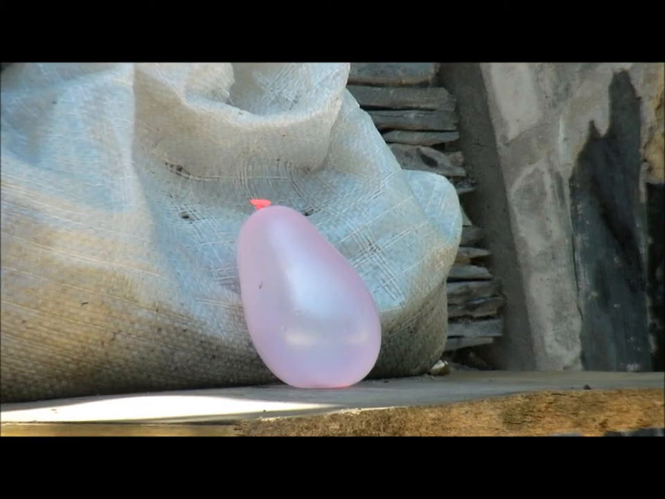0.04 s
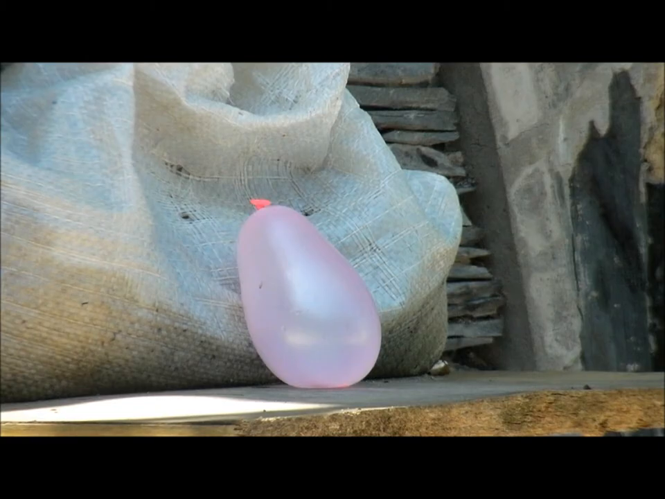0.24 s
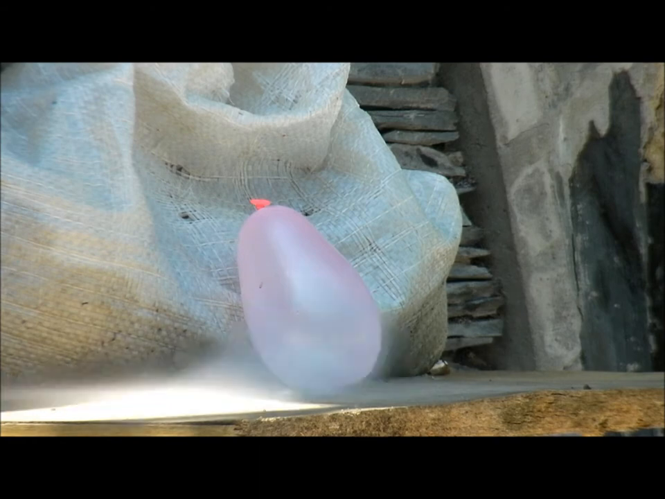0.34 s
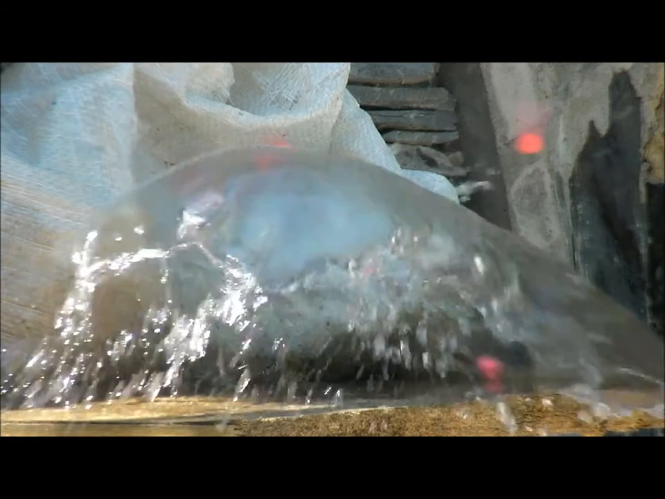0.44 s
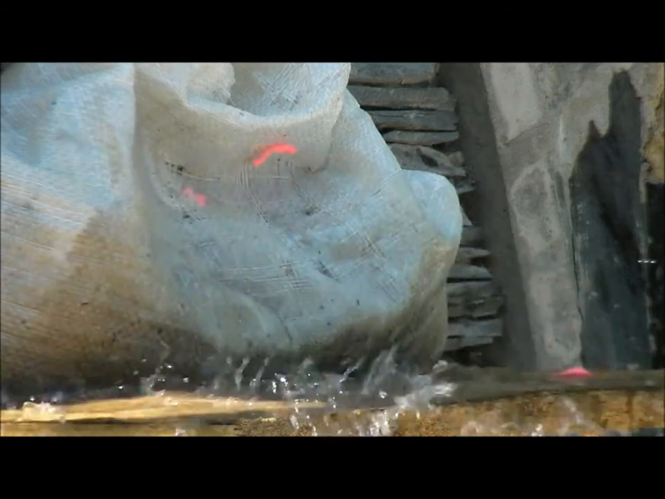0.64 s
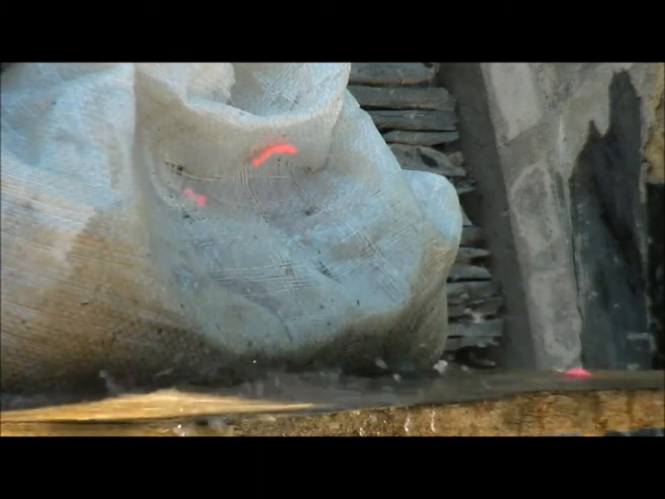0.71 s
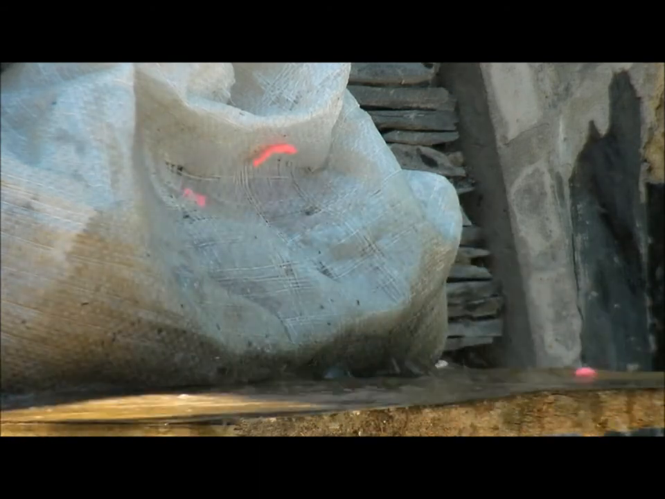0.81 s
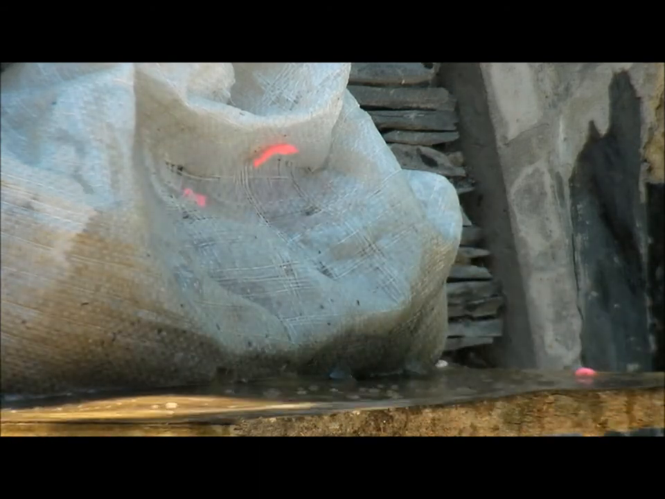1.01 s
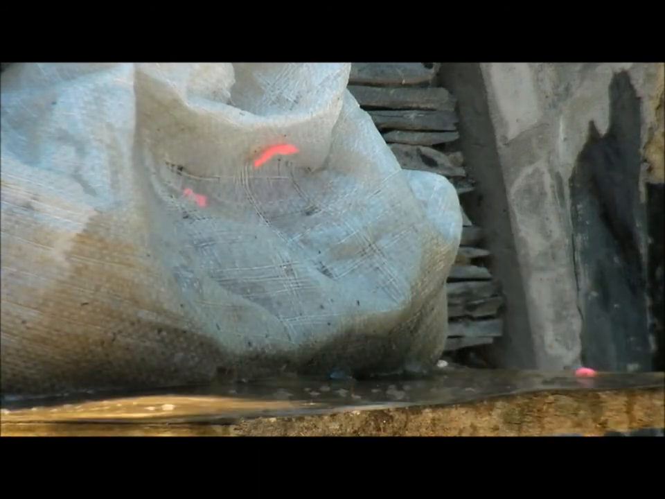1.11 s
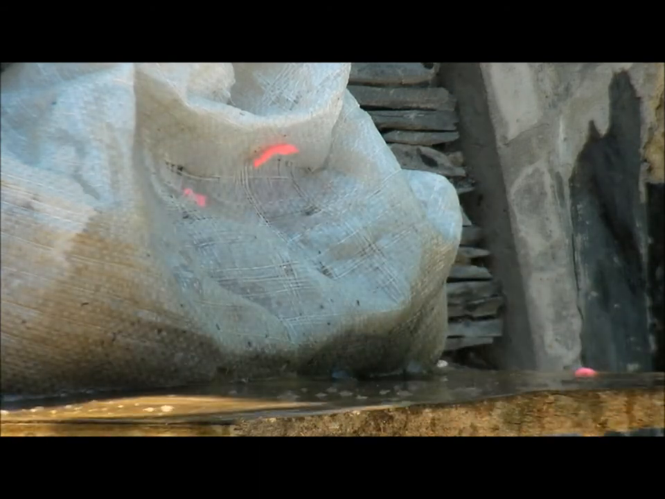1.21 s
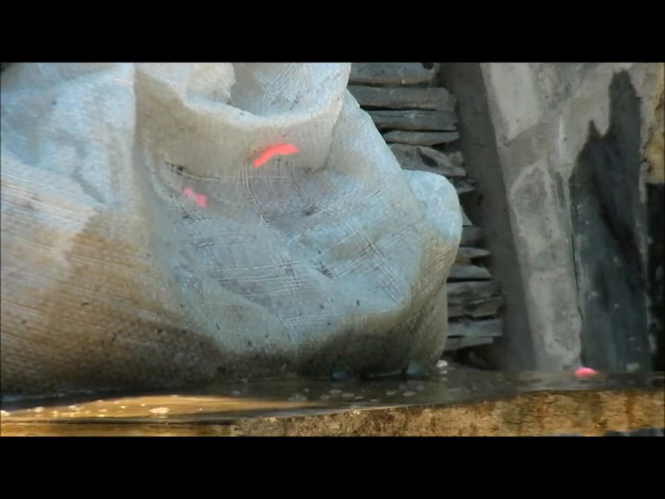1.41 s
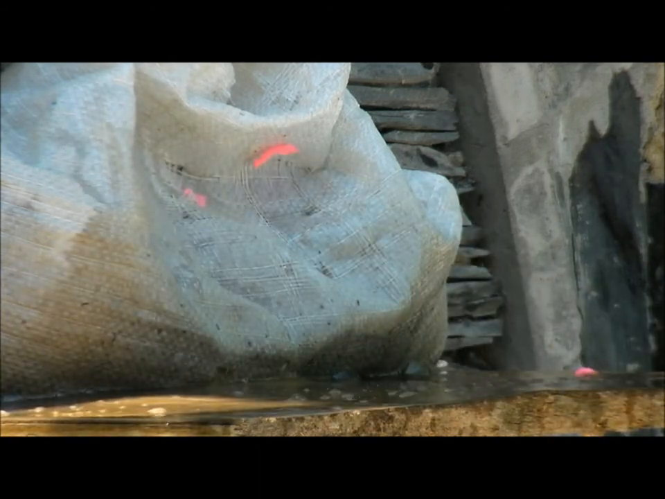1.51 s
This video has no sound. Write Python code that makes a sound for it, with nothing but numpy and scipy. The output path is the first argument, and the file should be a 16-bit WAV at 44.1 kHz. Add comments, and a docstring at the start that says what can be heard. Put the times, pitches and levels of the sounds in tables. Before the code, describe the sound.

A water balloon bursts on a stone ledge after a quick air gun snap; spray tears and water slaps down, then drops patter out over faint hiss and low rumble, recorded close with clipping stereo microphones.

```python
"""Faint air hiss and a low wavering rumble fade up first, then an air gun snaps and pops.
Its pellet bursts a water balloon on a stone ledge close to a camera, whose two microphones overload.
The water tears into spray (fine noise grains) and slaps down (coarse grains, bubbles, dying tones and thumps).
The walls ring on, and late drops patter on the stone as short noisy rings with bright ticks."""
import sys
import numpy as np
from scipy import signal
from scipy.fft import rfft, irfft
from scipy.io import wavfile
from scipy.ndimage import uniform_filter1d

SR = 44100
rng = np.random.default_rng(int(sys.argv[2]) if len(sys.argv) > 2 else 0)


def level_to_linear(level):
    """Convert decibel levels to linear amplitude factors, elementwise."""
    exponent = np.asarray(level, float) / 20
    return 10 ** exponent


def dump(signal):
    """Clip the signal to [-1, 1] and save it as 16-bit WAV at the path in sys.argv[1]."""
    limited = np.clip(np.atleast_2d(signal).T, -1, 1)
    pcm = np.round(limited * 32767).astype(np.int16)
    wavfile.write(sys.argv[1], SR, pcm)


N = 68355  # length [samples]


def evened(x):
    """Scales to rms 1."""
    return x / np.sqrt(np.mean(x ** 2) + 1e-20)


def read(points, hz):
    """Reads a table on a log-frequency axis."""
    f, value = np.transpose(points)
    return np.interp(np.log(hz + 1), np.log(f + 1), value)


def level(curve):
    """Gain over time from a dB curve, all but silent before its first point."""
    s, db = np.transpose(curve)
    return level_to_linear(np.interp(np.arange(N) / SR, s, db, left=-120))


def add(mix, s, sound):
    """Adds a sound at time s, cut off at the end of the mix."""
    part = mix[:, round(s * SR):][:, :sound.shape[1]]
    part += sound[:, :part.shape[1]]


def colour(x, tone):
    """Filters noise by a spectrum table, then scales to rms 1."""
    gain = level_to_linear(read(tone, np.fft.rfftfreq(N, 1 / SR)))
    return evened(irfft(rfft(x) * gain, N))


def band(x, hz, width_hz):
    """One resonance applied twice, rms 1."""
    b, a = signal.iirpeak(min(hz, 0.45 * SR), hz / width_hz, SR)
    return evened(signal.lfilter(b, a, signal.lfilter(b, a, x)))


def sine(hz, t):
    """A steady pure tone."""
    return np.sin(2 * np.pi * hz * t)


def dying(t, db, t60, rise_s):
    """A quick rise times a decay that starts at db and falls 60 dB in t60 seconds."""
    return level_to_linear(db - 60 * t / t60) * (1 - np.exp(-t / rise_s))


def grains(per_s, spread_db, grain_s, bed):
    """Two draws of noise swelling in short puffs of random size, over a steady bed."""
    size = level_to_linear(spread_db * np.minimum(rng.exponential(1, N), 4))
    size *= rng.random(N) < per_s / SR
    power = signal.lfilter([1], [1, -np.exp(-1 / (grain_s * SR))], size ** 2)
    return (bed + evened(np.sqrt(power))) * rng.standard_normal((2, N))


def slow_drift():
    """A slow random wander of rms 1."""
    noise = rng.standard_normal(N)
    return evened(uniform_filter1d(uniform_filter1d(noise, 1800), 1800))


# Spectrum of the air hiss: (frequency [Hz], level [dB per Hz])
AIR_TONE = [(76, -33.5), (130, -8), (180, -11), (330, -9.5), (450, -8), (700, -12), (1600, -14),
            (2400, -20), (3300, -20), (4300, -16.5), (5200, -24.5), (7900, -31), (12000, -30.5),
            (12800, -25), (13600, -29.5), (15400, -29.5)]
# Swell of the dull part of the hiss: (time [s], level [dB])
AIR_DULL_SWELL = [(0, -0.5), (.6, 0.5), (1.05, -3), (1.2, 1), (1.4, -1.5), (1.55, 1)]


def air_hiss():
    """Air noise whose strength drifts in patches of time and pitch, while its dull part swells."""
    hz, t, z = signal.stft(rng.standard_normal((2, N)), SR, nperseg=2048)
    swell_db = np.interp(t, *np.transpose(AIR_DULL_SWELL))
    z *= level_to_linear(swell_db / (1 + (hz[:, None] / 800) ** 2))  # the swell fades out above 800 Hz
    patches = uniform_filter1d(rng.standard_normal(z.shape[1:]), size=2, axis=0)
    patches = evened(uniform_filter1d(patches, size=3, axis=1))
    patchy = signal.istft(z * level_to_linear(3.3 * patches), SR, nperseg=2048)[1][:, :N]
    return level_to_linear(-48.5) * colour(patchy, AIR_TONE)


# Spectrum of the low noise bed: (frequency [Hz], level [dB per Hz])
LOW_BED_TONE = [(10, -77), (25, -45), (45, -27.5), (68, 1.5), (82, -11), (145, -10), (170, -25.5),
                (260, -54), (440, -120)]


def low_bed():
    """Steady noise, strongest in the deep bass, under the rumble."""
    return level_to_linear(-53.5) * colour(rng.standard_normal((2, N)), LOW_BED_TONE)


# Strength of the rumble, one list before and one after the burst: (time [s], level [dB])
RUMBLE_LEVEL = [
    [(0.0, -67), (0.012, -67), (0.022, -48.5), (0.036, -39), (0.054, -43), (0.076, -52), (0.088, -65),
     (0.102, -50), (0.124, -45), (0.164, -35), (0.225, -43)],
    [(0.33, -49), (0.346, -67), (0.366, -44), (0.386, -37), (0.41, -42), (0.502, -44.5), (0.532, -67),
     (0.56, -47), (0.59, -64), (0.618, -44.5), (0.646, -42), (0.676, -63), (0.692, -47.5), (0.726, -48),
     (0.76, -65), (0.794, -47), (0.818, -50), (0.838, -67), (0.856, -50), (0.882, -45), (0.9, -49),
     (0.914, -66.5), (0.978, -45), (1.1, -39.5), (1.148, -47.5), (1.212, -65), (1.226, -50), (1.44, -50),
     (1.454, -67), (1.55, -57)],
]
# Pitch of the rumble before its waver: (time [s], frequency [Hz])
RUMBLE_PITCH = [(0, 103.9), (.2, 106.7), (.45, 110.9), (.62, 97.86), (1.1, 96.7), (1.44, 93.2),
                (1.55, 82.5)]


def rumble():
    """A low tone blended with noise around its pitch, wavering in strength and pitch."""
    clean, waver, width_hz = 0.72, 0.04, 58  # share of pure tone, rms pitch ratio, noise width
    hz = np.interp(np.arange(N) / SR, *np.transpose(RUMBLE_PITCH)) * (1 + waver * slow_drift())
    tone = np.sqrt(2) * np.sin(2 * np.pi * np.cumsum(hz) / SR)
    noise = band(rng.standard_normal((2, N)), hz.mean(), width_hz)
    return evened(clean * tone + (1 - clean) * noise) * level(RUMBLE_LEVEL[0] + RUMBLE_LEVEL[1])


# Wavering tones in the background: (time [s], length [s], level [dB], frequency [Hz])
FAINT_TONES = [(0.022, 0.077, -53, 1000), (0.098, 0.068, -56, 970), (1.249, 0.064, -57.5, 350),
               (1.26, 0.0533, -57.5, 531), (1.29, 0.058, -60, 1520), (1.339, 0.055, -54, 561),
               (1.428, 0.055, -55, 1590)]


def faint_tones():
    """Short soft tones that swell and fade while their pitch wanders slightly."""
    out, drift = np.zeros((2, N)), slow_drift()
    for s, length, db, hz in FAINT_TONES:
        size = round(length * SR)
        wavering_hz = hz * (1 + 0.014 * drift[-size:])
        tone = np.sin(2 * np.pi * np.cumsum(wavering_hz) / SR)
        add(out, s, level_to_linear(db) * np.sqrt(np.hanning(size)) * tone * np.ones((2, 1)))
    return out


def background():
    """All that sounds around the ledge apart from gun and water."""
    return air_hiss() + low_bed() + rumble() + faint_tones()


# Small drops falling in clumps: (time [s], level [dB])
PATTER_LEVEL = [(.56, -56), (.635, -58), (.642, -45.5), (.66, -48), (.683, -51), (.692, -45.5),
                (.735, -46.5), (.745, -54), (.775, -53), (.785, -48.5), (.81, -48.5), (.835, -53.5),
                (.875, -57), (.89, -55), (.92, -59), (1.0, -65.5), (1.07, -63), (1.15, -71)]
# Spectrum of the small drops: (frequency [Hz], level [dB per Hz])
PATTER_TONE = [(1200, -45), (2200, -19.5), (3000, -3), (4300, -3.5), (6500, -3), (7800, -18.5), (9000, -4),
               (15400, -15)]


def patter():
    """Small drops on stone: sparse, very short grains of widely varied size at random times."""
    fade = np.clip((PATTER_LEVEL[-1][0] - np.arange(N) / SR) / 0.1004, 0, 1)
    fine = grains(per_s=680, spread_db=5.0, grain_s=0.001096, bed=0.53)
    return colour(fine, PATTER_TONE) * level(PATTER_LEVEL) * fade


# Single late drops: (time [s], splat level [dB], splat frequency [Hz], treble tick level [dB])
DROPS = [(0.5244, -27.5, 4560, -56.5), (0.585, -33, 2630, -50), (0.5904, -35, 4500, -52),
         (0.6106, -47.5, 2970, -46), (0.6421, -34, 5900, -44), (0.6439, -32.5, 4080, -41.5),
         (0.6674, -38, 3860, -46.5), (0.6893, -26.5, 4034, -51), (0.696, -29, 4980, -47),
         (0.7004, -35, 3570, -45), (0.7074, -27, 4480, -48.5), (0.7162, -32, 4160, -47),
         (0.7214, -35, 3100, -51.5), (0.7233, -30.5, 4200, -47), (0.732, -37, 4150, -40),
         (0.7387, -46.5, 4700, -29), (0.7612, -36, 3760, -49.5), (0.7814, -29, 5000, -55.5),
         (0.7917, -41, 5640, -49.5), (0.7971, -33.5, 4500, -49.5), (0.8002, -29, 5720, -48.5),
         (0.821, -36, 6900, -50.5), (0.8266, -40, 4200, -51), (0.8404, -45, 3740, -54),
         (0.8614, -45, 3880, -54), (0.8814, -50, 4030, -59), (0.8904, -41, 4240, -55.5),
         (0.9036, -40, 4402, -58), (1.0694, -44.5, 4260, -56.5)]


def drops():
    """Each late drop on the stone is a short, partly noisy ring with a bright tick."""
    clean, width_hz, ring_s, tick_s = 0.4, 2200, 0.02, 0.008  # share of pure tone; times to fall 60 dB
    out, t = np.zeros((2, N)), np.arange(1500) / SR
    for s, db, hz, tick_db in DROPS:
        splat_noise, tick_noise = rng.standard_normal((2, 2, len(t)))
        splat = clean * np.sqrt(2) * sine(hz, t) + (1 - clean) * band(splat_noise, hz, width_hz)
        tick = band(tick_noise, 12000, 9000) * level_to_linear(tick_db - 60 * t / tick_s)
        add(out, s, splat * dying(t, db, ring_s, rise_s=0.00049) + tick)
    return out


# Slosh of the falling water and its ring between the walls: (time [s], level [dB])
SLOSH_LEVEL = [(.238, -52), (.246, -19.5), (.262, -18.5), (.275, -13.5), (.287, -7.5), (.305, -14.5),
               (.325, -24), (.343, -23), (.355, -17.5), (.374, -20), (.385, -16.5), (.42, -20.5),
               (.435, -23), (.45, -21.5), (.469, -27), (.50, -30.5), (.535, -31), (.565, -35), (.6, -39.5),
               (.64, -45), (.75, -54.5), (.95, -79)]
# Spectrum of the slosh: (frequency [Hz], level [dB per Hz])
SLOSH_TONE = [(60, -44.5), (150, -9.5), (300, -22.5), (500, -16.5), (750, -5.5), (1100, -3), (1500, -1.5),
              (2200, -5), (3000, -18), (5000, -24.5), (9000, -61)]


def slosh():
    """Coarser, lower grains of heavy water with bubbles of many sizes in it."""
    bubbles, cycles = np.zeros((2, N)), 14
    for hz in np.geomspace(350, 2200, num=24):
        turns = np.arange(0, cycles, hz / SR)
        swell = np.sin(np.pi * np.sqrt(turns / cycles)) ** 2
        pop = np.sin(2 * np.pi * turns * (1 + 0.003 * turns)) * swell  # pitch creeps up
        starts = (rng.random((2, N)) < 8 / SR) * 1.0  # 8 bubbles per second of each size
        bubbles += signal.oaconvolve(starts, pop[None], axes=1)[:, :N]
    lumps = colour(grains(per_s=300, spread_db=2.0, grain_s=0.002, bed=3.5), SLOSH_TONE)
    return (lumps + level_to_linear(-5) * colour(bubbles, SLOSH_TONE)) * level(SLOSH_LEVEL)


# Tearing spray: (time [s], level [dB])
SPRAY_LEVEL = [(.238, -48.5), (.243, -14.5), (.251, -26.5), (.254, -9), (.260, -17.5), (.266, -2.5),
               (.278, -4), (.292, -2.5), (.30, -8.5), (.327, -11.5), (.345, -17), (.40, -18), (.469, -28),
               (.53, -35.5), (.6, -49), (.68, -48.5), (.8, -85)]
# Spectrum of the spray before it dulls: (frequency [Hz], level [dB per Hz])
SPRAY_TONE = [(880, -45), (1500, -11.5), (1860, -2.5), (2420, -8), (3180, -4.5), (3440, -4.5), (4560, -2.5),
              (6420, -10), (15400, -17)]


def spray():
    """Dense fine grains that grow duller as the sheet of water falls apart."""
    dulls_db, from_s, over_s = 6, 0.285, 0.047  # final loss per octave above 4 kHz; start, time constant
    fine = colour(grains(per_s=1700, spread_db=1.0, grain_s=0.0018, bed=0.69), SPRAY_TONE)
    hz, t, z = signal.stft(fine, SR, nperseg=256)
    octaves = np.maximum(np.log2((hz[:, None] + 1) / 4000), 0)
    loss_db = dulls_db * (1 - np.exp(-np.maximum(t - from_s, 0) / over_s)) * octaves
    return signal.istft(z / level_to_linear(loss_db), SR, nperseg=256)[1][:, :N] * level(SPRAY_LEVEL)


# Air trapped in the water: (time [s], level [dB], frequency [Hz], time to fall 60 dB [s])
GLUGS = [(.258, -9.5, 597.5, 0.091), (.287, -11.5, 785.7, 0.053), (.350, -17, 1117, 0.073),
         (.595, -31, 738, 0.0713), (.352, -16.5, 617, .08), (.36, -25, 298, .08), (.385, -31, 353.8, 0.064),
         (.445, -27, 800, 0.043), (.495, -35.5, 363, 0.14), (.505, -27.5, 727, 0.16)]


def glugs():
    """Trapped air rings in the water as plain dying tones."""
    out, t = np.zeros((2, N)), np.arange(6000) / SR
    for s, db, hz, t60 in GLUGS:
        add(out, s, dying(t, db, t60, rise_s=0.0033) * sine(hz, t) * np.ones((2, 1)))
    return out


# Air push of pop, burst and slap: (time [s], right level [dB], frequency [Hz], time to fall 60 dB [s])
THUMPS = [(.255, -13.5, 110, .05), (0.279, -3, 103.6, 0.055), (.278, -13, 35, .08), (0.353, -23, 150, .1)]


def thumps():
    """Low pushes of air as dying tones, stronger at the right microphone."""
    out, t = np.zeros((2, N)), np.arange(6000) / SR
    sides = level_to_linear(np.array([[-7], [0]]))  # left, right [dB]
    for s, db, hz, t60 in THUMPS:
        add(out, s, dying(t, db, t60, rise_s=0.003) * sine(hz, t) * sides)
    return out


# Gun and water blows: (time [s], level [dB], centre [Hz], width [Hz], time to fall 60 dB [s])
BLOWS = [(.2402, -4.5, 4500, 2500, 0.011), (0.2431, -1.5, 5910, 2200, 0.0096),
         (0.2425, -10, 4670, 1500, 0.0178), (.2470, -10, 2130, 900, 0.028), (0.2534, 3, 2200, 900, 0.012),
         (0.254, -2, 5200, 3974, 0.009), (.2526, -11, 11100, 9000, 0.0091),
         (.2615, 1.5, 4050, 2500, 0.0234), (.2640, 2, 5530, 3000, 0.018), (.2660, -4.5, 10450, 4000, 0.036),
         (0.272, 3.5, 4606, 2000, 0.026), (.2775, 0, 3322, 1500, 0.02), (0.2839, -1.5, 4560, 1500, 0.026),
         (.2860, 5, 1668, 600, 0.036), (.2970, -1, 4400, 3500, .02), (.3080, -2, 2040, 900, .02),
         (.3200, -9.5, 1209, 702, .03), (0.3521, -3, 935, 500, .02), (.3550, -6, 1030, 495.1, .016),
         (0.3657, -4, 904, 496, .02), (0.3932, -11.5, 1700, 900, 0.018), (.4030, -13, 1945, 884, 0.027),
         (.3860, -11.5, 1929, 1000, 0.062), (.4180, -10.5, 1474, 800, 0.031),
         (.4440, -12.5, 1046, 498.5, 0.034)]


def blows():
    """Each blow of gun or water is a quick ring with noise in the same resonance; wide ones are all noise."""
    out, t = np.zeros((2, N)), np.arange(6000) / SR
    for s, db, hz, width_hz, t60 in BLOWS:
        clean = 0.6 if hz > 1.5 * width_hz else 0  # share of pure tone
        noise = band(rng.standard_normal((2, len(t))), hz, width_hz)
        burst = clean * np.sqrt(2) * sine(hz, t) + (1 - clean) * noise
        add(out, s, burst * dying(t, db, t60, rise_s=0.0006))
    return out


def ports(x, same, lead=((1, 0), (2, 0)), tilt=((1, 0), (2, 0))):
    """Two microphone ports: the right hears the first draw shifted, blended with the second."""
    hz = np.fft.rfftfreq(N, 1 / SR)
    first, second = rfft(x)
    likeness = np.clip(read(same, hz), -1, 1)
    gain = level_to_linear(read(tilt, hz) / 2)  # half the tilt on each side
    shifted = first * np.exp(-1j * read(lead, hz))
    right = likeness * shifted + np.sqrt(1 - likeness ** 2) * second
    return irfft([first * gain, right / gain], N)


# Left-right likeness of near and background sound: (frequency [Hz], likeness [-1 to 1])
NEAR_SAME = [(60, .95), (640, .96), (1400, 0.96), (3100, 0.81), (6800, 0.88), (15000, 1)]
FAR_SAME = [(60, 0.79), (130, 1), (290, 0.62), (640, 0.65), (1410, 0.13), (3100, 0.23), (6810, 0.54),
            (15000, -0.21)]
# Lead of the left port for near sound: (frequency [Hz], phase [radians])
NEAR_LEAD = [(100, -1), (2300, 0.04), (3300, 1.3), (4000, -0.9), (7500, 1.46), (9200, 1.5), (12000, 2),
             (15000, 1.5)]
# Left against right for near sound: (frequency [Hz], level [dB])
NEAR_TILT = [(60, -1), (110, -2), (200, 1), (380, 0), (700, -1.0), (1290, 0.5), (2380, -5.5), (4400, 0),
             (8120, 1), (15000, 3.5)]


def scene():
    """Near sounds reach both ports much alike, the background less so."""
    near = patter() + drops() + slosh() + spray() + glugs() + blows()
    return ports(background(), FAR_SAME) + thumps() + ports(near, NEAR_SAME, NEAR_LEAD, NEAR_TILT)


def band_limit(x):
    """A steep low-pass at the top of the band."""
    return signal.sosfilt(signal.butter(12, 15590, fs=SR, output="sos"), x)


def record(dry):
    """The microphones fade in from a low level, then clip hard at full scale when overloaded."""
    shut_db, open_s, rise_s = -19, 0.02, 0.0096  # level at first, when it starts to rise, length of rise
    shut = np.clip(1 - (np.arange(N) / SR - open_s) / rise_s, 0, 1)
    mix = np.clip(dry * level_to_linear(shut_db * shut), -1, 1)
    return band_limit(mix)


dry = scene()
out = record(dry)
dump(out)
```